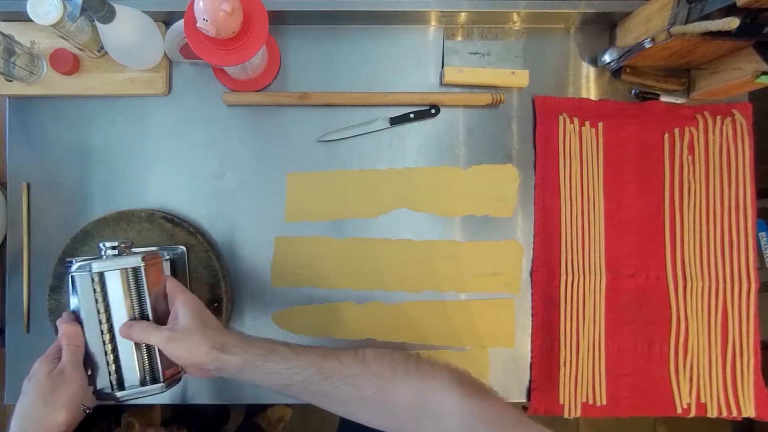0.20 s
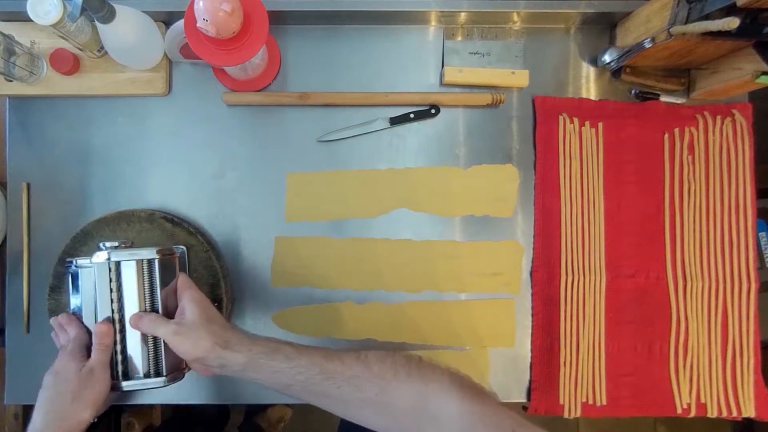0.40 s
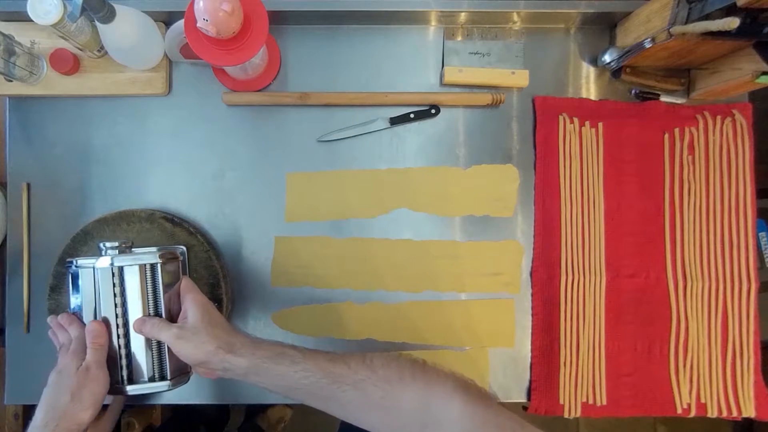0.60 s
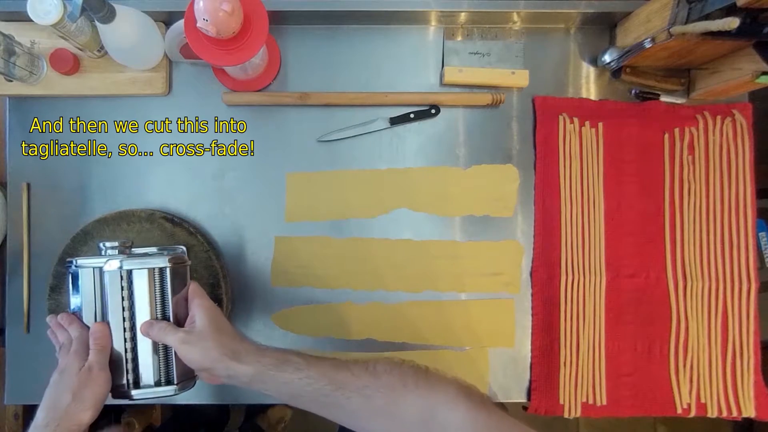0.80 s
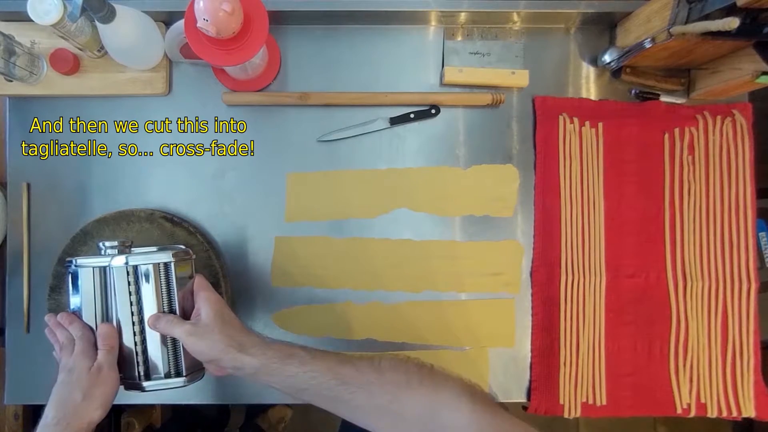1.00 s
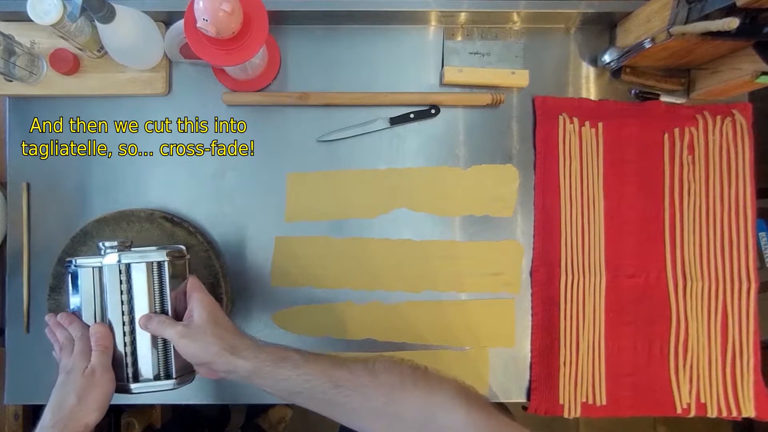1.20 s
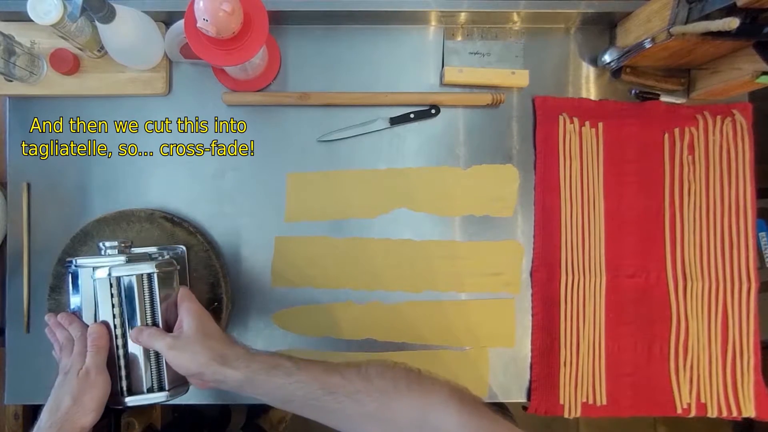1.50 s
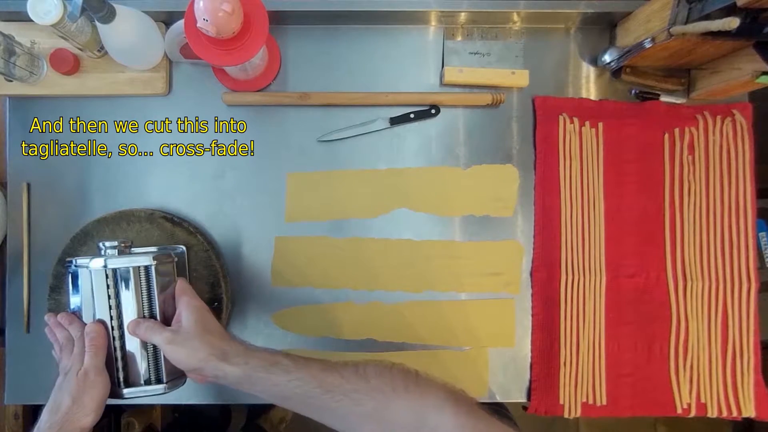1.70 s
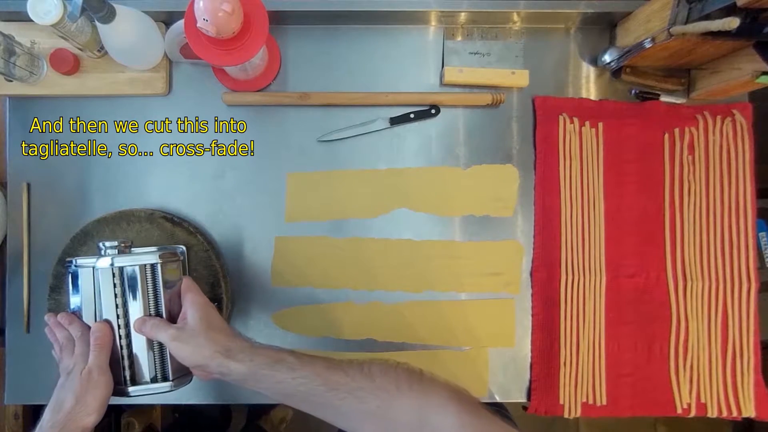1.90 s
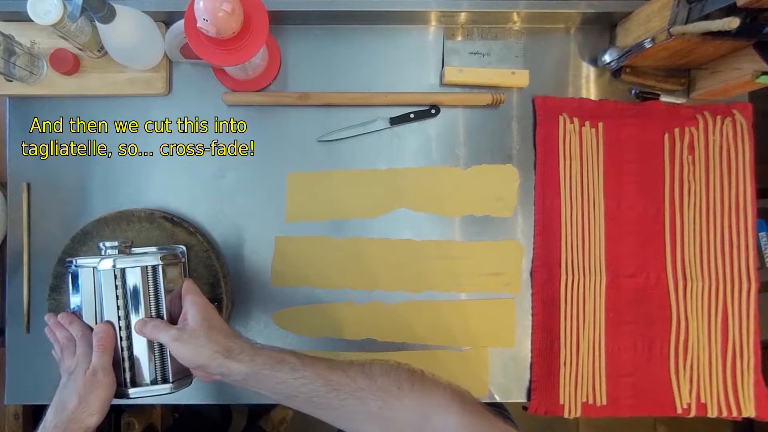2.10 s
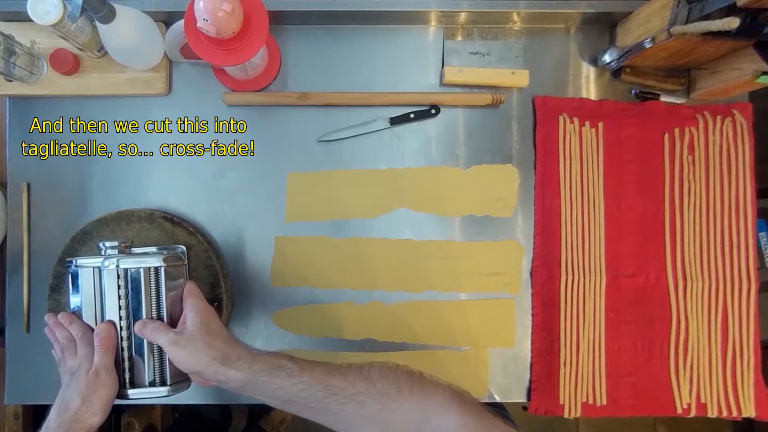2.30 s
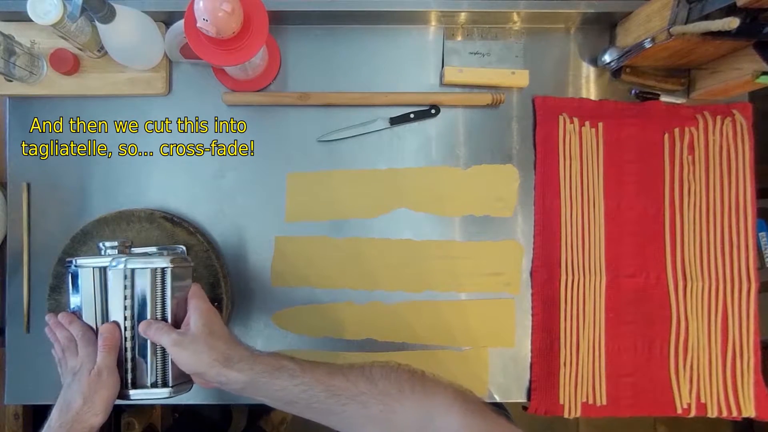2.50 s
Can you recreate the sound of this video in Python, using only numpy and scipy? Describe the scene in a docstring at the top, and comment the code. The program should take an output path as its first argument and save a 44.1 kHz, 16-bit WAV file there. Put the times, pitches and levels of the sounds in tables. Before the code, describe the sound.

Metal pasta machine part slides and clanks as hands fit it, knocking and rattling on a worktop

```python
"""Hands fit a sheet-steel cutter onto a pasta machine that stands on a kitchen worktop.
Over a faint floor an earlier blow wavers away, as beating sines; the part slides along its rail, a dense run
of clicks ringing it, and a few blows fall within the slide. From about 0.4 s many more blows and a rattle ring
banks of steel modes while it rubs lightly; jolts thump the worktop throughout; faint touches end it.
Feedback delays make a small hard room; a band-limited microphone above hears it all."""
import sys
import numpy as np
from scipy import signal
from scipy.fft import rfft, irfft
from scipy.io import wavfile

SR = 44100
rng = np.random.default_rng(int(sys.argv[2]) if len(sys.argv) > 2 else 0)


def wav_record(signal):
    """Record a signal, one row per channel, as 16-bit PCM in the file named by sys.argv[1]."""
    frames = np.transpose(np.atleast_2d(signal))
    bounded = np.clip(frames, -1, 1)
    # unit amplitude maps onto the largest positive 16-bit level
    quanta = np.round(bounded * 32767).astype(np.int16)
    wavfile.write(sys.argv[1], SR, quanta)


def field_ratio(decibels):
    """Amplitude ratio for a level in dB (20 dB per decade); scalars and array-likes work."""
    return 10 ** (np.asarray(decibels, dtype=float) / 20)


N = 114660  # samples, 2.6 s


def rms_one(x):
    """Scale to rms 1."""
    return x / np.sqrt(np.mean(x ** 2) + 1e-20)


def at_hz(spectrum, hz):
    """Read a spectrum in dB along a log pitch axis."""
    point_hz, level_db = np.array(spectrum).T
    return np.interp(np.log(hz), np.log(point_hz), level_db)


def add(out, start_s, sounds):
    """Place one sound at each time."""
    for start, sound in zip((start_s * SR).astype(int), sounds):
        out[start:start + len(sound)] += sound


def evened(sounds):
    """Equal strength over the first 30 ms of each row."""
    onset = sounds[:, :SR // 33]
    return sounds / np.sqrt(np.mean(onset ** 2, axis=1, keepdims=True))


def rings(modes):
    """One dying sine per mode, half a second long, one row each."""
    pitch_hz, level_db, t60_s = np.transpose(modes)[:, :, None]
    t = np.arange(SR // 2) / SR
    decay = field_ratio(level_db - 60 * t / np.maximum(t60_s, .01))
    return decay * np.sin(2 * np.pi * pitch_hz * t)


def strengths(count, size):
    """Every contact point drives each mode with its own strength and sign."""
    spread_db = 4.5
    draw = rng.standard_normal((count, 2, size))
    return field_ratio(spread_db * draw[:, 0]) * np.sign(draw[:, 1])


PANEL_T60_S, PANEL_DECAY_SLOPE = 0.24, -0.017  # t60 at 2 kHz before slight scatter, power of frequency


def crowd(colour, gain_db, count):
    """Many weak modes at chance pitches, evenly dense, following a spectrum."""
    pitch_hz = 750 + (np.arange(count) + rng.random(count)) * 10200 / count
    t60_s = PANEL_T60_S * (pitch_hz / 2000) ** PANEL_DECAY_SLOPE * rng.uniform(1.0, 1.006, count)
    return np.transpose([pitch_hz, at_hz(colour, pitch_hz) + gain_db, t60_s])


# colour of the faint room noise: pitch_hz, level_db (relative, per Hz)
FLOOR_COLOUR = [(15, -33), (25, 1), (295, 1), (797, -6.5), (1000, -0.5), (1400, -14.5), (1550, 2),
                (1850, -16.5), (2510, -17), (6270, -24), (11000, -38), (14300, -81), (22000, -120)]
FLOOR_DB = -57.5  # rms of the whole floor


def floor():
    """Steady room noise: white noise shaped to the floor's colour."""
    hz = np.maximum(np.arange(N // 2 + 1) * SR / N, 1)
    shaped = rfft(rng.standard_normal(N)) * field_ratio(at_hz(FLOOR_COLOUR, hz))
    return field_ratio(FLOOR_DB) * rms_one(irfft(shaped, N))


ROOM_T60_S, WALL_CUT_HZ, ROOM_DB = 0.43, 12700, -14.5


def kitchen(x):
    """Small hard room: ten feedback delays, duller on every round, stepped block by block."""
    out = np.zeros(N)
    dull = np.exp(-2 * np.pi * WALL_CUT_HZ / SR)
    lags = (rng.uniform(.012, .035, 10) * SR).astype(int)
    for k, lag in enumerate(lags):
        loop, state = x.copy(), [0.]
        gain = field_ratio(-60 * lag / SR / ROOM_T60_S)
        for i in range(lag, N, lag):
            back, state = signal.lfilter([gain * (1 - dull)], [1, -dull], loop[i - lag:i], zi=state)
            loop[i:i + lag] += back[:N - i]
        out += (loop - x) * (-1) ** k  # echoes only, alternating sign
    return field_ratio(ROOM_DB) * out


# an earlier blow still wavering away at the start: centre_hz, level_db (relative), t60_s
DYING_MODES = [(1513, -36, 0.11), (1430, -65, .15), (2480, -60.5, 0.44), (3240, -50, 0.15), (4240, -69, .4),
               (4960, -56, 0.38)]
DYING_SPLIT_HZ = 130  # furthest a mode lies from its centre


def dying():
    """Each ring is a cluster of nine close modes that beat."""
    scatter = rng.uniform(-1, 1, (9 * len(DYING_MODES), 1)) * [DYING_SPLIT_HZ, 0, 0]
    cluster = np.repeat(DYING_MODES, 9, axis=0) + scatter
    sound = strengths(count=1, size=len(cluster))[0] @ rings(cluster) / np.sqrt(9)
    return np.pad(sound, (0, N - SR // 2))


# low modes of the worktop: pitch_hz, level_db (relative), t60_s
WORKTOP_MODES = [(35, -2, 0.13), (58.9, 7, 0.17), (105, 4, .2), (159.8, 1.5, 0.3), (204.4, 7, 0.16),
                 (234.1, 3, 0.16), (327.3, -5, .15), (411.4, -8, 0.21)]


def worktop_rings():
    """The worktop answers any push with its low modes."""
    return rings(WORKTOP_MODES)


# jolts into the worktop: start_s, deep_modes_db, upper_modes_db (drive before a chance spread)
JOLTS = [(0.131, -52, -64.5), (0.176, -35, -41), (0.26, -39.5, -57), (0.349, -49, -56), (0.448, -30, -35.5),
         (0.54, -34, -36.5), (0.595, -35, -35), (0.65, -49, -47), (0.78, -50, -47.5), (0.836, -38, -34.5),
         (0.881, -40.5, -35), (1.03, -37, -42), (1.09, -41, -37), (1.209, -53, -43), (1.42, -41.5, -36.5),
         (1.48, -42, -34), (1.54, -38, -30.5), (1.58, -33.5, -37.5), (1.661, -42, -31.5),
         (1.781, -41, -37.5), (1.89, -51, -40.5), (1.945, -35, -42), (2.09, -59, -51), (2.195, -52, -45)]
THUMP_RISE_S, DEEP_BELOW_HZ, JOLT_SPREAD_DB = 0.0068, 80, 2.5


def thumps():
    """Each jolt swells into the deep and the upper worktop modes."""
    start_s, deep_db, upper_db = np.transpose(JOLTS)[:, :, None]
    t, out = np.arange(SR // 2) / SR, np.zeros(N + SR)
    is_deep = np.array(WORKTOP_MODES)[:, 0] < DEEP_BELOW_HZ
    drive = field_ratio(np.where(is_deep, deep_db, upper_db))
    uneven = drive * field_ratio(JOLT_SPREAD_DB * rng.standard_normal(drive.shape))
    add(out, start_s[:, 0], uneven @ worktop_rings() * (1 - np.exp(-t / THUMP_RISE_S)))
    return out[:N]


def in_time(rows):
    """Level and rumble offset per sample; silent outside the table."""
    start_s, level_db, rumble_offset_db = np.transpose(rows)
    t = np.arange(N) / SR
    level = np.interp(t, start_s, level_db, left=-120, right=-120)
    return level, np.interp(t, start_s, rumble_offset_db)


def grains(gain, per_s, spread_db, body):
    """Chance clicks of uneven size, dealt to six contact points of a body; about rms 1 before the gain."""
    hits = rng.random(N) < per_s / SR
    clicks = hits * field_ratio(spread_db * np.minimum(rng.exponential(1, N), 3))
    dealt = rng.integers(0, 6, N)
    voices = strengths(count=6, size=len(body)) @ body
    scale = np.sqrt(np.mean(clicks ** 2) * np.sum(voices ** 2) / 6)
    out = np.zeros(N)
    for k, voice in enumerate(voices):
        out += signal.fftconvolve(clicks * gain * (dealt == k), voice)[:N]
    return out / scale


def contact(rows, steel_db, per_s, spread_db, body):
    """Running contact: one run of grains into the steel and another into the worktop."""
    level_db, rumble_offset_db = in_time(rows)
    metal = grains(field_ratio(level_db + steel_db), per_s, spread_db, body)
    rumble = grains(field_ratio(level_db + rumble_offset_db), per_s, spread_db, worktop_rings())
    return metal, rumble


# clear modes of the part on its rail: pitch_hz, level_db (relative), t60_s (before the grip)
RAIL_MODES = [(992, -6, 0.28), (1144, 4.5, 0.24), (1699, -4, 0.15), (2610, -6.5, 0.096), (3250, -7.5, .2),
              (3960, -6, 0.18), (4430, -12, 0.13), (5070, -5, 0.42)]
# colour of the part's crowd of weak modes: pitch_hz, level_db (relative)
PART_COLOUR = [(410, -74), (700, -47), (881, -13.5), (1150, -1.5), (1330, -10.5), (1620, -9.5), (2270, -11),
               (2630, -9), (5190, -14), (11000, -41), (14300, -80), (22000, -120)]
SLIDE_GRIP_T60_S = 0.35


def sliding_part():
    """Rings of the part on its rail, damped further by the hands' grip."""
    part = rings(np.vstack([RAIL_MODES, crowd(PART_COLOUR, 2.5, count=300)]))
    return part * field_ratio(-60 * np.arange(SR // 2) / SR / SLIDE_GRIP_T60_S)


# the part slides along the rail: start_s, level_db (relative), rumble_offset_db (worktop against level_db)
SLIDE_CURVE = [(0.1, -48.5, -24), (0.134, -66.5, 7), (0.2, -22.5, -16.5), (0.228, -20.5, -31),
               (0.298, -43, -20), (0.332, -42, -17.5), (0.388, -50.5, -6.5), (0.422, -39.5, -26),
               (0.44, -38.5, -0.5)]
# it keeps rubbing lightly while it is fitted: start_s, level_db, rumble_offset_db (as above)
RUB_CURVE = [(0.46, -41, -19), (0.61, -49.5, -16), (0.84, -52, -14), (1.03, -50, -16.5), (1.19, -58, -18),
             (1.25, -68, -16), (1.48, -61, -17), (1.6, -42, -16), (1.65, -43, -15), (1.82, -49.5, -14),
             (1.94, -52, -15), (2.15, -56, -13), (2.33, -78, -14), (2.6, -94, -14)]


def slide_and_rub(part):
    """Sliding is a dense run of tiny grains that ring the part and the worktop."""
    return contact(np.vstack([SLIDE_CURVE, RUB_CURVE]), steel_db=-1, per_s=1900, spread_db=-1.5, body=part)


# clear modes of the frame: pitch_hz, level_db (relative), t60_s (free ring)
FRAME_MODES = [(519, -27.5, .12), (556, -19.5, 0.1), (588.5, -18.5, 0.11), (608.5, -20.5, 0.14),
               (767, -20, .25), (900.3, -9, 0.17), (1000, -2, 0.11), (1007.3, -13.5, 0.18),
               (1084.6, -3.5, 0.23), (1112, -10, 0.55), (1188.7, -4, 0.17), (1214.7, -3.5, 0.14),
               (1427.3, -13.5, 0.1), (1580, -21, 0.13), (1591, -18.5, 0.067), (1932, -13.5, 0.1),
               (2092, -17, 0.074), (2445, -15, 0.1), (2493, -13.5, 0.14), (4174, -27, 0.14)]
# colour of the crowd of small panel modes: pitch_hz, level_db (relative)
PANEL_COLOUR = [(440, -47), (750, -21.5), (830, -15.5), (1180, 1), (1340, -8), (1630, 2), (1880, -14.5),
                (2550, -8.5), (3530, -20), (4320, -21.5), (6850, -32.5), (9270, -47.5), (11000, -65),
                (14300, -94), (22000, -120)]


def steel_modes():
    """The frame's clear modes plus a crowd of small panel modes."""
    return np.vstack([FRAME_MODES, crowd(PANEL_COLOUR, -10, count=300)])


# loose contact between the parts: start_s, level_db (relative), rumble_offset_db (worktop against level_db)
RATTLE_CURVE = [(0.4, -48, -16), (0.5, -33, -20), (0.64, -34, -22), (0.99, -27, -18), (1.17, -34, -20),
                (1.26, -43.5, -17), (1.48, -33.5, -18.5), (1.61, -36.5, -7), (1.78, -29.5, -19),
                (2.1, -45.5, -19.5), (2.15, -35.5, -23), (2.29, -61, -21), (2.46, -53.5, -27),
                (2.6, -58, -13)]


def rattle(steel):
    """Small touches at chance moments ring the steel and the worktop."""
    return contact(RATTLE_CURVE, steel_db=-9, per_s=400, spread_db=3.5, body=rings(steel))


# blows of part on frame: start_s, peak_db (relative), brightness_db_per_octave,
# grip_t60_s (damping by the hands, on top of each mode's own decay)
BLOWS = [(0.188, -28.5, -1, 0.14), (0.202, -16.5, 0, 0.062), (0.212, -18.5, 5, 0.087), (0.449, 0, 4, 0.23),
         (0.544, -5, 2.1, 0.19), (0.596, -1.5, 1.3, 0.19), (0.779, -26, 5.5, .3), (0.834, -6.5, 0.6, 0.27),
         (0.861, -8, .6, 0.14), (0.874, -6, 1.2, 0.18), (0.896, -12, 0.3, 0.11), (0.907, -17.5, 0.5, 0.28),
         (1.019, -28.5, 11.5, .4), (1.031, -12, 0.3, 0.23), (1.097, -13, 4, 0.17), (1.267, -33.5, 2, 0.24),
         (1.348, -35.5, -4, 0.31), (1.421, -26.5, 3.5, 0.34), (1.44, -16, 1.1, 0.27),
         (1.485, -5, -2.5, .12), (1.498, -11, 0, .15), (1.539, -7.5, .6, 0.27), (1.570, -6, 1.5, 0.14),
         (1.582, -10.5, -0.5, 0.16), (1.604, -12, 0, 0.17), (1.627, -14.5, 2.2, .15),
         (1.646, -5.5, 3.5, 0.18), (1.783, -15.5, 2, 0.35), (1.898, -11, -2, 0.21), (1.946, -7, 1.2, .2),
         (2.036, -32.5, 2.2, 0.26), (2.089, -13.5, -5.5, 0.18), (2.170, -29, 3, 0.46),
         (2.195, -15.5, 1.2, 0.31), (2.260, -27, 1, 0.27), (2.505, -39, -5, 0.4), (2.513, -36, -2.2, 0.56)]
KNOCK_DB, CONTACT_S = -12.5, 0.001  # gain of all blows, time constant of the rise
CRACK_DB, CRACK_S = -2.5, 0.013  # extra first burst of each blow


def knocks(steel):
    """Each blow rings the steel, tilted by its brightness and damped by the hands."""
    start_s, peak_db, brightness_db, grip_t60_s = np.transpose(BLOWS)[:, :, None]
    t, out = np.arange(SR // 2) / SR, np.zeros(N + SR)
    octaves = np.log2(np.maximum(steel[:, 0], 1300) / 1300)  # tilt starts at 1300 Hz
    drive = field_ratio(brightness_db * octaves) * strengths(count=len(start_s), size=len(steel))
    blows = evened(drive @ rings(steel))
    damping = field_ratio(peak_db + KNOCK_DB - 60 * t / np.maximum(grip_t60_s, .02))
    rise = 1 - np.exp(-t / CONTACT_S)
    crack = 1 + field_ratio(CRACK_DB) * np.exp(-t / CRACK_S)
    add(out, start_s[:, 0], blows * damping * rise * crack)
    return out[:N]


def scene():
    """Steel sounds fill the room; the worktop reaches the microphone through its stand."""
    steel = steel_modes()
    part = sliding_part()
    rattle_metal, rattle_rumble = rattle(steel)
    slide_metal, slide_rumble = slide_and_rub(part)
    metal = knocks(steel) + dying() + rattle_metal + slide_metal
    in_room = metal + kitchen(metal)
    worktop = thumps() + rattle_rumble + slide_rumble
    return (in_room + worktop + floor())[None]


# dips in the response at the microphone: pitch_hz, width_hz, depth (0-1)
RESPONSE_DIPS = [(412, 128, 0.44), (677, 94, 0.76), (7980, 1150, 0.9)]
CLIP_TOP, CUTOFF_HZ = 0.55, 11640  # ceiling of the rounded peaks (full scale 1), edge of the top cut


def microphone(x):
    """Narrow dips in the response, rounded peaks, then a steep top cut."""
    for pitch_hz, width_hz, depth in RESPONSE_DIPS:
        band = signal.lfilter(*signal.iirpeak(pitch_hz, pitch_hz / width_hz, fs=SR), x)
        x = x - np.clip(depth, 0, 1) * band
    x = x / (1 + (x / CLIP_TOP) ** 4) ** (1 / 4)
    return signal.sosfilt(signal.cheby2(12, 70, CUTOFF_HZ, fs=SR, output="sos"), x)


def top_cut(x):
    """Nothing passes above the cut-off."""
    return signal.sosfilt(signal.butter(12, 11120, fs=SR, output="sos"), x)


def record(dry):
    """The scene as the band-limited microphone hears it."""
    mix = microphone(dry)
    return top_cut(mix)


dry = scene()
out = record(dry)
wav_record(out)
```